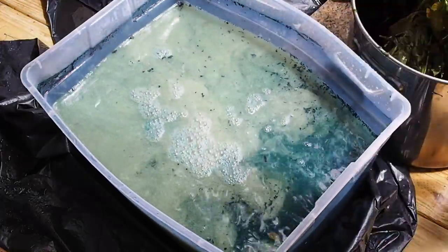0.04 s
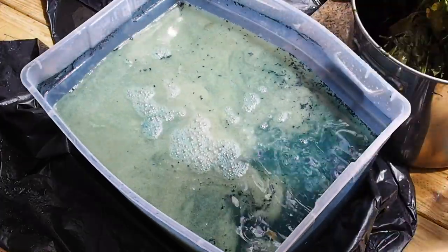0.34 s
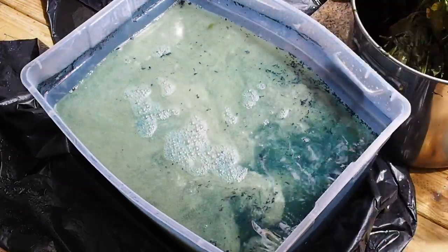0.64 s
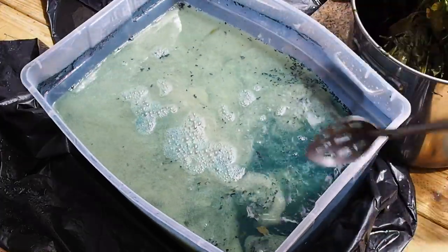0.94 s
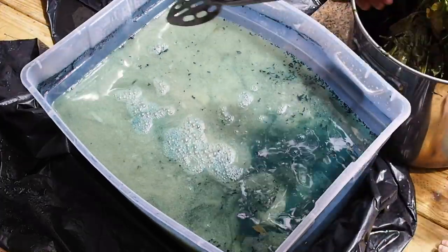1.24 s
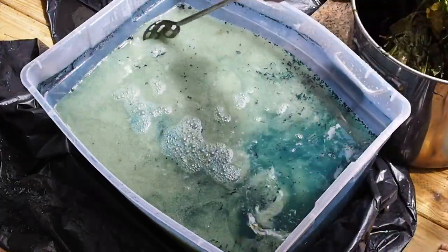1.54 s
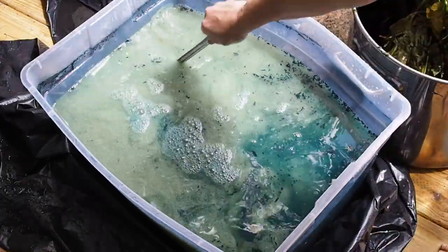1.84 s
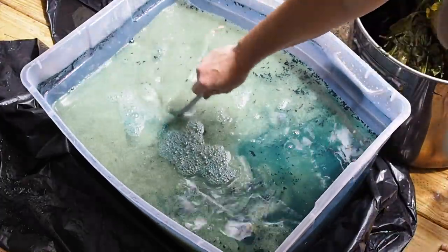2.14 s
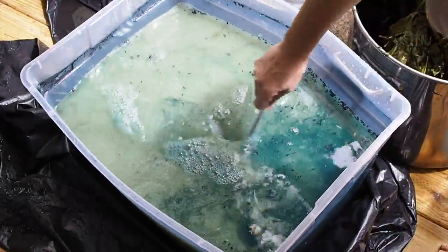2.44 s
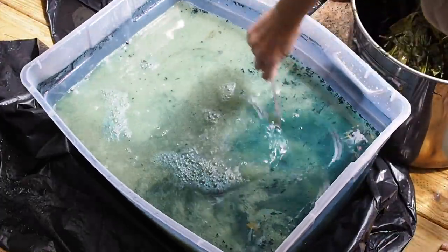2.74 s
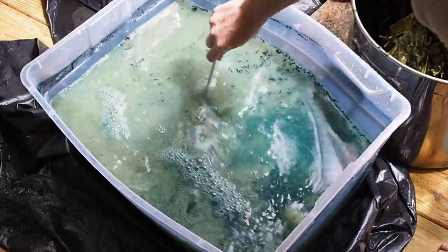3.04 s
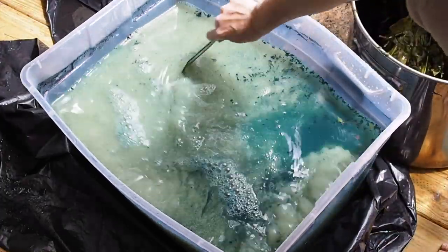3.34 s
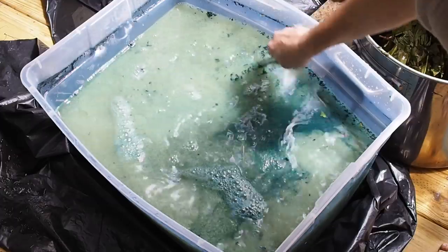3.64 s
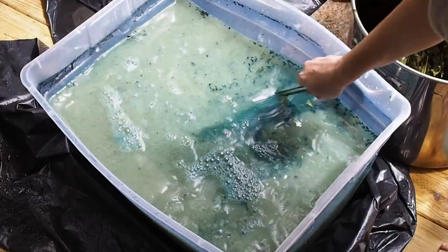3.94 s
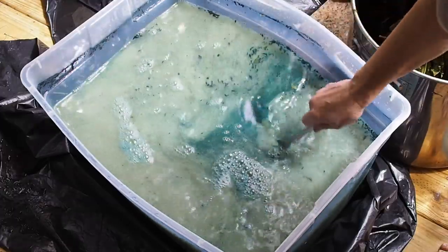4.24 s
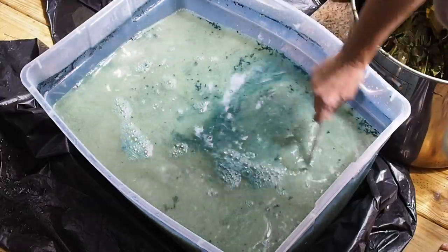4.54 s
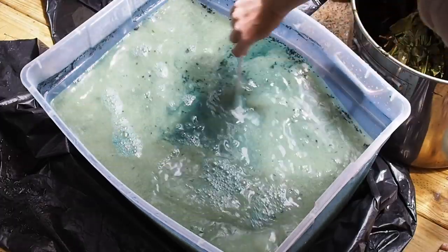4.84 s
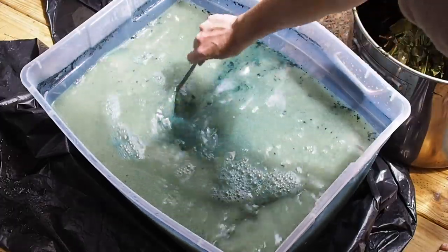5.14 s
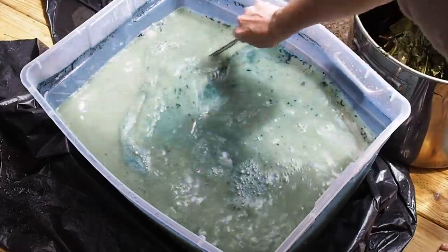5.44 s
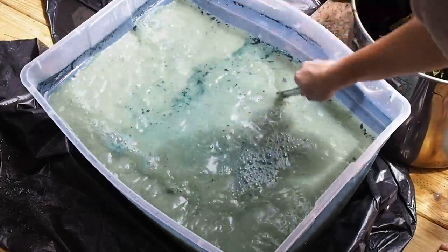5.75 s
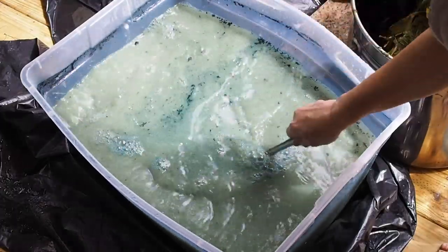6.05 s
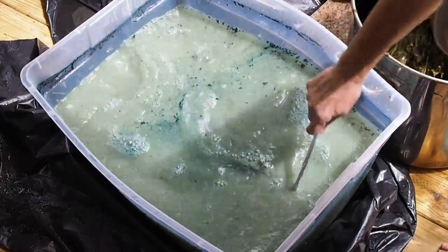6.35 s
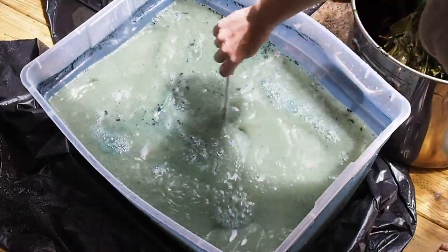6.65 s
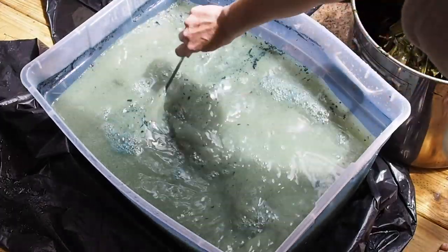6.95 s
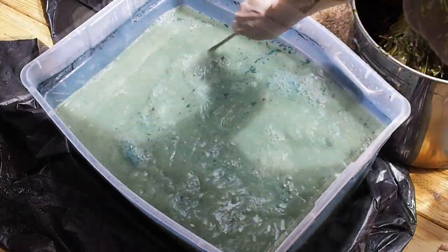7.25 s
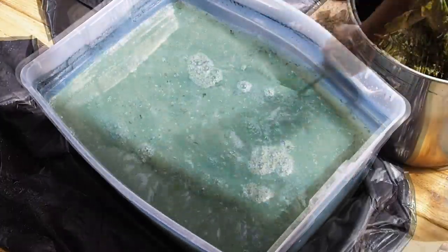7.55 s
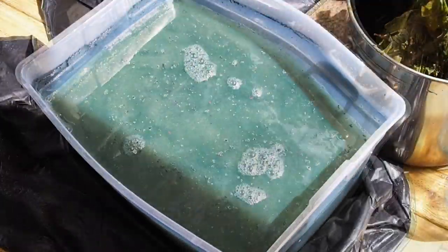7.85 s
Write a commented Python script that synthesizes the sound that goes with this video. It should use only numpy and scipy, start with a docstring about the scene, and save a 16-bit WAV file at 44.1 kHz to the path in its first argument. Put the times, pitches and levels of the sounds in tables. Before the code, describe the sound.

Faint room hiss and a soft bump give way to irregular stirring of liquid in a plastic tub. Each stroke of the spoon drags up gurgling bubbles and small splashes, mixed with hollow knocks, dry clacks and low thuds from the tub. One sharp crack stands out late, followed by a few last plops. The sound is close and in stereo, with the short echo of a small room.

```python
"""A slotted spoon stirs liquid in a plastic tub, indoors, close up and in stereo.
The spoon knocks the water-loaded walls and floor, which rattle, thud and hum on. Each stroke drags
air under, so bubbles gurgle and plop, while spray patters and drops tick on the surface.
Behind it all sit the short echo and steady hiss of a small room."""
import sys
import numpy as np
from scipy import signal
from scipy.fft import rfft, irfft, next_fast_len
from scipy.io import wavfile
from scipy.ndimage import map_coordinates

SR = 44100
rng = np.random.default_rng(int(sys.argv[2]) if len(sys.argv) > 2 else 0)


def unload_audio(sound):
    """Save the sound as a 16-bit wav file, at the path given as the first command line argument."""
    columns = np.transpose(np.atleast_2d(sound))
    # keep every value between -1 and 1, then stretch to whole-number steps
    steps = np.round(np.clip(columns, -1, 1) * 32767)
    wavfile.write(sys.argv[1], SR, steps.astype(np.int16))


N = 352817
TIME = np.arange(N) / SR
TOP_HZ, PIVOT_HZ = 16000, 860  # band limit; brightness tilts a spectrum about the pivot

# Blows of spoon and waves on the tub: t/s, level/dB, brightness/(dB/oct), panel boom/dB, thud/dB,
# hum/dB, wall note f/Hz, wall note level/dB, hollow ring/dB
BLOWS = [(0.193, -47, -10.5, -2, -26.5, -35.5, 228.5, -23, -30.5),
         (0.489, -68.5, -6.5, 6, -42, -55, 216, -49, -63), (1.681, -42, 0.5, -2, -50, -74, 276, -40, -39),
         (2.046, -35.5, 0, -0.5, -41.5, -37.5, 352, -29, -54),
         (2.162, -45.5, -0.5, 6, -52, -48, 272, -40, -42),
         (2.221, -38.5, -0.5, 0.5, -35.5, -53, 304, -35, -36),
         (2.719, -43, 1, 6, -35.5, -65, 278, -49, -39), (2.765, -44, 1, 8, -42, -48, 216, -45, -44),
         (3.3987, -32, -3, -5.5, -40, -35, 215, -37, -23.5),
         (3.602, -34, -0.5, -12, -39, -64, 270, -41, -33),
         (3.6715, -34, -2, -5, -35.5, -37, 271.5, -27, -22),
         (3.733, -35.5, -1, -11, -42, -74, 211, -44, -35), (4.263, -37, 2, 3, -30, -38.5, 277, -36, -55),
         (4.548, -30.5, -3, -3, -31.5, -49, 268, -25, -22), (4.757, -41, 3, 8, -35.5, -41, 271, -44, -53),
         (5.089, -50.5, -1, -7, -61, -65, 273, -55, -47), (5.114, -44, 1.5, -10, -50, -48, 277, -48, -44),
         (5.19, -49, -3.5, -3, -53, -47, 275, -46, -40.5), (5.341, -39, -0.5, 4, -36, -32, 272, -35.5, -41),
         (5.368, -45.5, -9, -12, -46, -57, 323, -38, -55),
         (5.557, -33, -0.5, -12, -36, -57, 275, -33.5, -33),
         (5.6026, -33, -1.5, 2, -37, -38, 290, -26, -24), (5.676, -37.5, -2, -19, -33, -58, 330, -36, -27),
         (5.741, -33, 1, -22, -52, -68, 275, -41, -38),
         (6.057, -41, 2.5, 7.5, -33.5, -42.5, 278, -41.5, -39),
         (6.4047, -33, 2, -7, -43, -50, 302, -43, -28.5), (6.596, -39.5, 3, 7, -38.5, -50, 275, -45, -45),
         (6.859, -36, -0.5, -9, -36, -64, 275, -33, -42), (6.987, -39, -1.5, -3.5, -43, -45, 273, -52, -39),
         (7.138, -31, 0, -1, -33, -32.5, 272, -28, -42), (7.3527, -26.5, 3, 5, -26.5, -42.5, 278, -22, -33),
         (7.651, -42, 1.5, -2, -66, -82, 273, -36, -32.5), (7.909, -53, 1, 8, -69, -75, 273, -45, -49)]
# Tone of an ordinary blow: f/Hz, level/dB
BLOW_EQ = [(170, 0.5), (425, 3.5), (930, 0), (1900, -3.5), (5100, -11.5)]
# Rattle bands of the walls: low f/Hz, high f/Hz, t60/s, level/dB, base energy share of the contact
WALL_BANDS = [(172, 324, 0.23, -1.5, 0.28), (318, 552, 0.26, -1, 0), (650, 1180, 0.19, 2.5, 0.28),
              (1500, 2135, 0.12, -0.5, 0.24), (2730, 10700, 0.16, -1, 0.17)]
# Lesser modes of the filled tub: f/Hz, level/dB, t60/s
TUB_MODES = [(201.5, -7.5, 0.2), (326.3, -1, 0.2), (460.3, -6, 0.14), (516.7, -3.5, 0.16),
             (577.7, -8.5, 0.17), (652, -6, 0.22), (865, -2, 0.069), (940, 4, 0.07), (1048, 0, 0.022),
             (1212, -3.5, 0.19), (1636, 9.5, 0.024)]
def knocks(attack_s=0.000099, window_s=0.016, share_per_db=0.035, hard_db=-47, detune=0.011):
    """Each blow is a sharp contact, a dense rattle of damped wall modes and a few ringing tub modes."""
    out, t = np.zeros((2, N)), np.arange(SR // 3) / SR
    centres = np.array([np.sqrt(lo * hi) for lo, hi, *_ in WALL_BANDS])
    even_energy = lambda x: x / np.sqrt(np.mean(np.sum(x ** 2, axis=-1)) / (window_s * SR))
    for s, blow_db, brightness, boom_db, *_ in BLOWS:
        colour = blow_db + along(BLOW_EQ, centres) + brightness * np.log2(centres / PIVOT_HZ)
        colour[0] += boom_db
        walls = stereo_noise(len(t), CLOSE_IMAGE) * (1 - np.exp(-t / attack_s))
        for (lo, hi, t60, gain_db, share), band_db in zip(WALL_BANDS, colour):
            # a hard, bright blow puts more of its energy into the first contact
            share = np.clip(share + share_per_db * (colour[-1] - hard_db), 0, .9)
            contact = even_energy(band(1.0 * (t == 0), lo, hi, order=2))
            rattle = even_energy(band(walls * decay(t, t60), lo, hi))
            hit = even_energy(np.sqrt(share) * contact + np.sqrt(1 - share) * rattle)
            add(out, s, amp(band_db + gain_db) * hit)
        # the place of the blow sets each mode's strength and sign; the moving water detunes it
        draws = rng.standard_normal((len(TUB_MODES), 3))
        for (hz, mode_db, t60), (size, side, load) in zip(TUB_MODES, draws):
            drive_db = along(list(zip(centres, colour)), hz) + mode_db + 2 * size
            add(out, s, np.sign(side) * amp(drive_db) * note(t, hz * (1 + detune * load), t60, .5 / hz))
    return out


def tub_notes(wall_cycles=70):
    """Two clear notes a blow: the struck wall's, which depends on the place, and the tub's hollow ring."""
    out, t = np.zeros(N), np.arange(SR // 2) / SR
    for s, *_, wall_hz, wall_db, hollow_db in BLOWS:
        add(out, s, amp(wall_db) * note(t, wall_hz, t60=wall_cycles / wall_hz, rise_s=0.001))
        add(out, s, amp(hollow_db) * note(t, hz=397.7, t60=0.21, rise_s=0.001))
    return out


def thuds(rumble_db=-7, hum_hz=158.4, hum_rise_s=0.026, waver=0.23):
    """The water heaves against the floor: a thud over a rumble, feeding the tub's long, low hum."""
    out, hum_energy, t = np.zeros(N), np.zeros(N), np.arange(SR) / SR
    heave = note(t, hz=153, t60=0.12, rise_s=0.019)
    swell = decay(t, t60=1) * (1 - np.exp(-t / hum_rise_s))
    for s, _, _, _, thud_db, hum_db, *_ in BLOWS:
        rumble = band(rng.standard_normal(SR) * decay(t, t60=0.47), lo_hz=72, hi_hz=140)
        thud = heave / heave.max() + amp(rumble_db) * rumble / np.abs(rumble).max()
        add(out, s, amp(thud_db) * thud)
        add(hum_energy, s, (amp(hum_db) * swell) ** 2)
    hum = np.sqrt(hum_energy) * np.sin(2 * np.pi * (hum_hz * TIME + rng.random()))
    return out + hum * (1 + waver * wobble(18))  # the hum wavers with the waves


# Edge hits: t/s, level/dB, brightness/(dB/oct)
EDGE_HITS = [(1.681, -32, 7), (2.221, -31, 6), (3.3995, -34.5, 11), (3.671, -34, 11), (4.2635, -31, -7.5),
             (5.3402, -26, 5), (5.556, -28.5, -6), (5.6015, -23, 6), (6.4047, -26, 15), (7.138, -24.5, 4),
             (7.3523, -17, -5)]
def clacks():
    """The spoon's edge catches the plastic with a dry, short snap."""
    return snaps(EDGE_HITS, trim_db=0, tail_db=-13.5, tail_t60=0.091)


# Square hits: t/s, level/dB, f/Hz
BOWL_HITS = [(1.681, -23, 805), (2.046, -27, 1150), (2.2208, -23, 980), (3.3992, -17, 910),
             (7.138, -31, 1090), (7.3521, -7.5, 1035)]
def raps(t60=0.011, octave_db=-7.5):
    """The spoon's bowl hits the wall squarely: a hard crack of a few cycles."""
    out, t = np.zeros(N), np.arange(SR // 12) / SR
    for s, db, hz in BOWL_HITS:
        octave = amp(octave_db) * note(t, 2 * hz, t60 / 2, rise_s=1 / SR)
        add(out, s, amp(db) * (note(t, hz, t60, rise_s=1 / SR) + octave))
    return out


# Single large bubbles: t/s, level at column three; the order is t/s, f/Hz, level/dB
BIG_BUBBLES = [(1.628, 583, -37), (1.628, 1345, -30.5), (2.051, 1055, -20.5), (2.223, 263, -15.5),
               (2.430, 1700, -22), (2.431, 1250, -30), (2.484, 900, -30), (2.502, 1830, -17.5),
               (2.503, 1230, -28), (2.531, 2760, -31), (2.54, 4340, -34), (2.574, 1840, -26),
               (2.615, 2500, -30), (2.619, 1690, -22), (2.683, 2030, -29.5), (2.943, 1870, -28.5),
               (3.103, 546, -31.5), (3.705, 3500, -22.5), (3.732, 3700, -26), (4.247, 1420, -28.5),
               (4.309, 1310, -28), (4.343, 2060, -29), (4.452, 1650, -25.5), (4.465, 2800, -30),
               (4.474, 1320, -25), (4.497, 1474, -26), (4.527, 1720, -32), (5.202, 1760, -13),
               (5.202, 2820, -21), (5.213, 1757, -13), (5.213, 3170, -23), (5.216, 5040, -30),
               (5.264, 4500, -28.5), (5.271, 984, -31), (5.289, 1590, -36), (5.331, 1586, -27),
               (5.379, 1840, -30), (5.659, 2090, -27), (6.095, 1877, -25.5), (6.149, 1300, -26),
               (6.158, 1680, -30), (6.180, 1660, -25), (6.19, 1300, -27), (6.312, 1860, -30),
               (6.405, 1613, -19.5), (6.674, 2050, -35), (6.716, 687, -29.5), (6.74, 3080, -26.5),
               (6.762, 3020, -35), (6.783, 3900, -35), (6.764, 1970, -30), (6.823, 1770, -27),
               (6.898, 4300, -27), (6.905, 1500, -31), (6.968, 1820, -36), (7.048, 816, -27.5),
               (7.064, 907, -27), (7.089, 1490, -29), (7.146, 6400, -17.5), (7.168, 6460, -34),
               (7.172, 3620, -26.5), (7.47, 1910, -35), (7.585, 962, -18.5), (7.735, 1630, -35)]
def plops(trim_db=-1.5, cycles=71, longest_t60=0.13, pinch_db=-11, pop_s=0.044, pop_fade_s=0.004,
          echo_db=-9, echo_s=0.009):
    """Large bubbles pinch off behind the spoon with a wet burst, then ring until they surface and pop."""
    out, t = np.zeros((2, N)), np.arange(SR // 4) / SR
    until_pop = (1 - np.tanh((t - pop_s) / pop_fade_s)) / 2
    for s, hz, db in BIG_BUBBLES:
        ring = bubble(t, hz, t60=min(cycles / hz, longest_t60), rise=0.083, onset_cycles=0.7)
        wet_noise = unit(band(stereo_noise(len(t), CLOSE_IMAGE), 0.94 * hz, 1.23 * hz, order=2))
        pinch = wet_noise * decay(t, t60=0.037) * (1 - np.exp(-t * hz))
        plop = amp(db + trim_db) * until_pop * (ring + amp(pinch_db) * pinch)
        add(out, s, plop)
        # a quick slap off the tub walls on each side, weaker for low notes
        for channel, echo, delay in zip(out, plop, echo_s * rng.uniform(.5, 1, 2)):
            add(channel, s + delay, amp(echo_db) * min(hz / PIVOT_HZ, 1) * echo)
    return out


# Spoon strokes: t/s, length/s, gurgle level/dB, spray level/dB, starting bubble f/Hz
SPOON_STROKES = [(2.472, 0.22, -43, -53.5, 1290), (2.995, 0.37, -57.5, -54, 1325),
                 (4.262, 0.13, -45, -53, 1110), (4.445, 0.066, -42, -49, 1420),
                 (5.263, 0.14, -46, -49, 1070), (5.685, 0.091, -58.5, -47.5, 1360),
                 (6.148, 0.16, -42.5, -53, 1440), (6.78, 0.29, -44.5, -50, 1210),
                 (7.535, 0.21, -49.5, -62, 1620)]
# Tone of the bubble cloud: f/Hz, level/dB
GURGLE_EQ = [(200, -39), (500, -0.5), (950, -3.5), (1250, 0), (1450, -5.5), (1780, 5.5), (2050, -6),
             (2400, -16), (4500, -10), (12000, -34)]
def gurgle(lap_db=-57, lap_hz=1230.0, climb_oct_per_s=2.28, wash_db=-4, glug_db=2.5):
    """The spoon's slots shed a cloud of bubbles in quick glugs; between strokes the surface laps."""
    level, pitch = amp(lap_db) * unrest(), np.full(N, lap_hz)
    for s, length, db, _, first_hz in SPOON_STROKES:
        swell = amp(db) * stroke_envelope(s, length, release_s=0.049)
        # bubbles shrink, and so rise in pitch, as the air pocket behind the spoon closes
        climb = first_hz * 2 ** (climb_oct_per_s * np.clip(TIME - s, 0, length))
        pitch = np.where(swell > level, climb, pitch)
        level = np.maximum(level, swell)
    cloud = swarm(count=11000, centre_hz=pitch, spread=0.3395, cycles=30, scatter_db=3)
    glugs = amp(glug_db * wobble(40))
    colour = lambda hz: amp(along(GURGLE_EQ, hz))
    wash = unit(filtered(stereo_noise(N, WIDE_IMAGE), colour))
    return level * glugs * (unit(filtered(cloud, colour)) + amp(wash_db) * wash)


def spray(fizz_db=-57.5, patter_db=-7, splash_db=1):
    """Strokes throw spray over a faint fizz: fine droplets patter, larger ones crackle with trapped air."""
    patter = np.array([swarm(3000, centre_hz=9400, spread=0.2, cycles=15, scatter_db=-2) for _ in 'LR'])
    splash = np.array([swarm(6000, centre_hz=3485, spread=0.27, cycles=20, scatter_db=7) for _ in 'LR'])
    level = amp(fizz_db) * unrest()
    for s, length, _, db, _ in SPOON_STROKES:
        level = np.maximum(level, amp(db) * stroke_envelope(s, length, release_s=0.043))
    return level * (amp(patter_db) * patter + amp(splash_db) * splash)


# Falling drops, the finest the brightest: t/s, level/dB, brightness/(dB/oct)
DROP_HITS = [(1.6267, -27.5, 14.5), (1.6332, -26.5, -8), (1.789, -36, 15), (2.5026, -32, 14),
             (2.6195, -33, 9), (2.7046, -33.5, 7), (2.9417, -32.5, 13), (2.9866, -36, 18),
             (3.0785, -31.5, -6), (3.706, -27, 10.5), (3.7808, -39, 14), (4.547, -20, 8),
             (4.9217, -34.5, 7), (5.2022, -23, -0.5), (5.2146, -27, 9), (5.868, -35, 18), (6.3258, -35, 17),
             (6.7176, -26, 9), (6.859, -31.5, -1), (7.0484, -29.5, 1), (7.0615, -34, 8), (7.147, -28.5, 11),
             (7.6693, -34.5, 9.5)]
def drops():
    """Drops and thin sheets of liquid hit the surface: a tick, then a little spray."""
    return snaps(DROP_HITS, trim_db=-1.5, tail_db=-11.5, tail_t60=0.14)


# Base tone of clacks and drops: f/Hz, level/dB
SNAP_EQ = [(300, -14.5), (1200, -15), (3300, 7), (6500, -12.5), (11500, -23.5), (16000, -37)]
def snaps(hits, trim_db, tail_db, tail_t60, snap_t60=0.011):
    """Each small impact is a snap of noise with a faint tail, tilted above the pivot."""
    out, t = np.zeros((2, N)), np.arange(SR // 12) / SR
    envelope = decay(t, snap_t60) + amp(tail_db) * decay(t, tail_t60)
    for s, db, brightness in hits:
        tilt_db = lambda hz: brightness * np.log2(np.maximum(hz / PIVOT_HZ, 1))
        colour = lambda hz: amp(along(SNAP_EQ, hz) + tilt_db(hz)) * (hz < TOP_HZ)
        noise = unit(filtered(stereo_noise(len(t), WIDE_IMAGE), colour))
        add(out, s, amp(db + trim_db) * noise * envelope)
    return out


def swarm(count, centre_hz, spread, cycles, scatter_db):
    """Many small bubbles of random size ring around a steady or moving pitch, at rms 1."""
    out, t = np.zeros(N), np.arange(SR // 12) / SR
    centre = np.broadcast_to(centre_hz, N)
    starts = rng.integers(N, size=count)
    for start, size, life, strength in zip(starts, *rng.standard_normal((3, count))):
        hz = np.clip(centre[start] * np.exp(spread * size), 150, 14000)
        t60 = cycles / hz * np.exp(.5 * min(life, 1))
        ring = bubble(t[:int(t60 * SR) + 2], hz, t60, rise=0.048, onset_cycles=1)
        add(out, start / SR, amp(scatter_db * min(strength, 2)) * ring)
    return unit(out)


def bubble(t, hz, t60, rise, onset_cycles):
    """A pocket of air pulses; its pitch climbs as it nears the surface."""
    chirp = np.sin(2 * np.pi * hz * t * (1 + rise * t / t60))
    return chirp * decay(t, t60) * (1 - np.exp(-t * hz / onset_cycles))


def stroke_envelope(start, length, release_s, attack_s=0.041):
    """A stroke swells, holds while the spoon moves, then dies away."""
    t = TIME - start
    return np.exp(np.minimum(t, 0) / attack_s - np.maximum(t - length, 0) / release_s)


def unrest(dip_s=1.6, attack_s=0.041, calm_db=-9):
    """The surface's own small sounds fade up from a calm bed as the spoon dips in."""
    return np.maximum(np.exp(np.minimum(TIME - dip_s, 0) / attack_s), amp(calm_db))


# Reverb time of the small room: f/Hz, t60/s
ROOM_DECAY = [(150, 0.44), (400, 0.18), (1500, 0.21), (4000, 0.23), (12000, 0.076)]
def room(x, predelay_s=0.004):
    """The room's reflections, drawn anew every third of a second as the sound moves about the tub."""
    out, step = np.zeros((2, N)), SR // 3
    for start in range(0, N, step):
        hz, t, spectrum = signal.stft(stereo_noise(step, WIDE_IMAGE), SR, nperseg=256)
        tail = signal.istft(spectrum * decay(t, along(ROOM_DECAY, hz)[:, None]), SR, nperseg=256)[1]
        echo = signal.fftconvolve(x[None, start:start + step], tail / np.linalg.norm(tail[0]), axes=1)
        add(out, start / SR + predelay_s, echo)
    return out


# Colour of the room tone: f/Hz, level/dB
HISS_EQ = [(15, -47), (25, -16), (108, -2.5), (153, -3), (185, -4.5), (277, -6), (394, -9.5), (463, -7),
           (677, -8.5), (936, -7.5), (2050, -14), (5450, -12), (6200, -20), (7400, -20), (13600, -25.5),
           (16000, -33)]
# Its fader ride: t/s, level/dB
HISS_FADER = [(0, -44.5), (7.25, -45), (7.55, -48), (7.8, -49), (8, -47.5)]
def hiss():
    """Steady room tone, a little softer at the end."""
    noise = unit(filtered(stereo_noise(N, WIDE_IMAGE), lambda hz: amp(along(HISS_EQ, hz))))
    return noise * amp(np.interp(TIME, *np.transpose(HISS_FADER)))


# Stereo image of diffuse sound: f/Hz, left-right correlation
WIDE_IMAGE = [(60, 0.73), (300, 0.88), (640, 0.76), (1400, 0.37), (3000, 0.01), (15000, 0.03)]
# Stereo image of the close tub walls: f/Hz, left-right correlation
CLOSE_IMAGE = [(200, 1), (600, 0.94), (1400, 0.64), (3000, 0.94), (12000, 0)]
def stereo_noise(size, image):
    """White noise, narrow in the bass and wide at the top."""
    angle = lambda hz: np.arccos(np.clip(along(image, hz), -1, 1)) / 2
    mid_side = lambda hz: np.array([np.cos(angle(hz)), np.sin(angle(hz))])
    mid, side = filtered(rng.standard_normal((2, size)), mid_side)
    return np.array([mid + side, mid - side])


def note(t, hz, t60, rise_s):
    """One mode swells and dies away."""
    return np.sin(2 * np.pi * hz * t) * decay(t, t60) * (1 - np.exp(-t / rise_s))


def decay(t, t60):
    """A fade of 60 dB every t60 seconds."""
    return 10 ** (-3 * t / t60)


def wobble(rate):
    """A smooth random curve, rate knots a second."""
    return map_coordinates(rng.standard_normal(int(N * rate / SR) + 4), [TIME * rate])


def amp(db):
    """Decibels to gain."""
    return 10 ** (np.asarray(db) / 20)


def unit(x):
    """Scale to rms 1."""
    return x / np.sqrt(np.mean(x ** 2) + 1e-20)


def along(points, hz):
    """Read (f/Hz, value) points on a log axis."""
    freqs, values = np.transpose(points)
    return np.interp(np.log(hz + 1), np.log(freqs + 1), values)


def filtered(x, response):
    """Zero-phase EQ; response gives the gain at each frequency."""
    n = x.shape[-1]
    padded = next_fast_len(n + 8192)
    return irfft(rfft(x, padded) * response(np.fft.rfftfreq(padded, 1 / SR)), padded)[..., :n]


def band(x, lo_hz, hi_hz, order=3):
    """Causal band-pass."""
    return signal.sosfilt(signal.butter(order, [lo_hz, hi_hz], 'band', fs=SR, output='sos'), x)


def add(track, s, x):
    """Mix x into the track at s seconds."""
    part = track[..., max(round(s * SR), 0):][..., :x.shape[-1]]
    part += x[..., :part.shape[-1]]


def scene(tub_send_db=-12, water_send_db=-9, pan_db=1.0, water_pan_db=0.45):
    """Tub and liquid feed the room; the mix leans slightly right, the liquid a touch further."""
    tub = knocks() + tub_notes() + thuds() + clacks() + raps()
    water = (plops() + gurgle() + drops() + spray()) * amp([[-water_pan_db], [water_pan_db]])
    echo = room(amp(tub_send_db) * tub.mean(axis=0) + amp(water_send_db) * water.mean(axis=0))
    return (tub + water + echo + hiss()) * amp([[-pan_db], [pan_db]])


def record(dry):
    """A brick-wall high cut at the band limit."""
    return filtered(dry, lambda hz: hz < TOP_HZ)


dry = scene()
out = record(dry)
unload_audio(out)
```